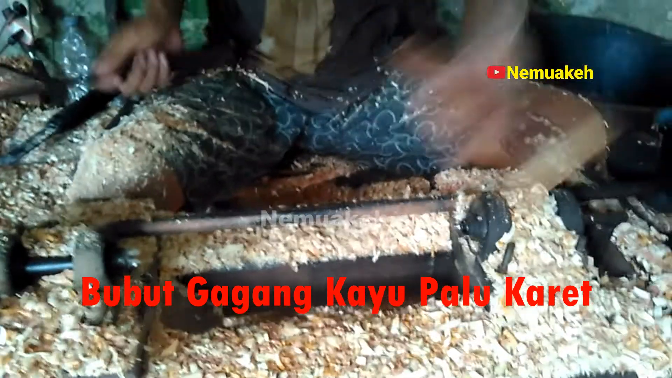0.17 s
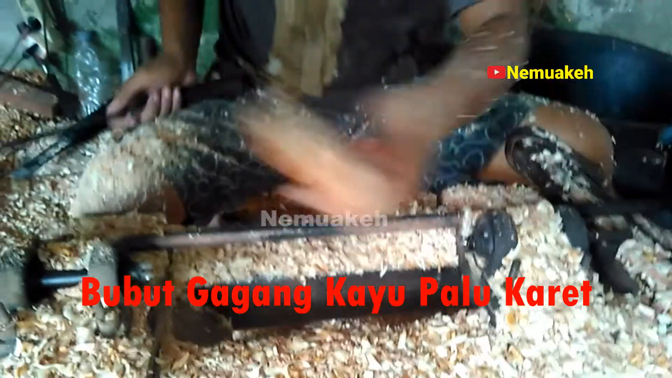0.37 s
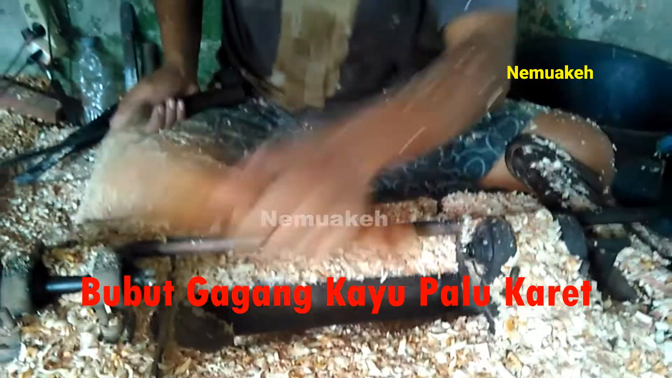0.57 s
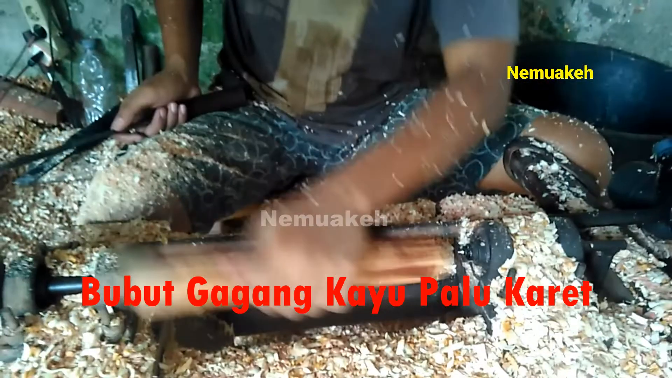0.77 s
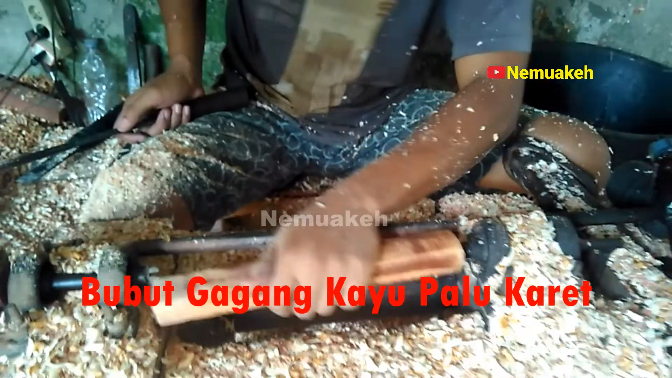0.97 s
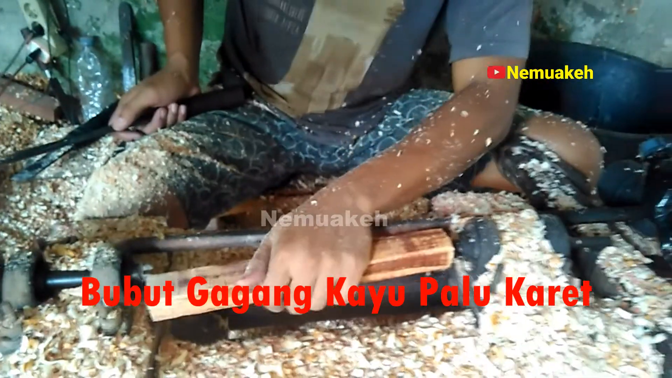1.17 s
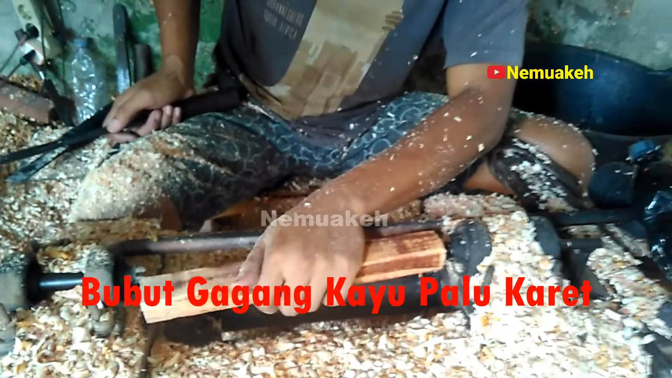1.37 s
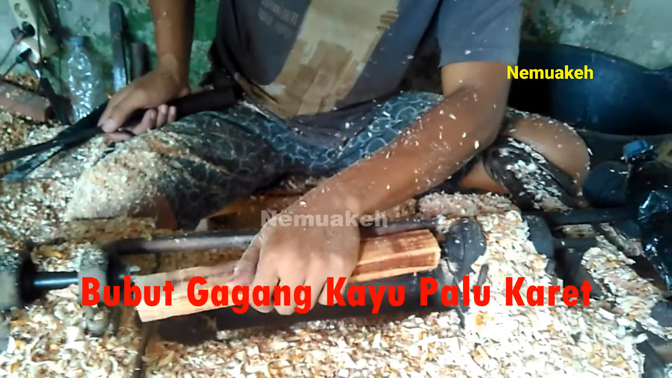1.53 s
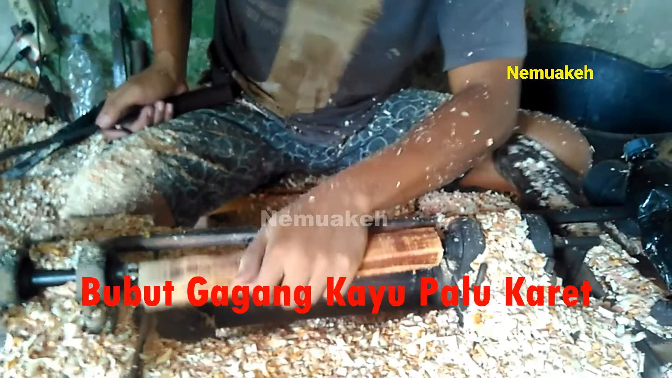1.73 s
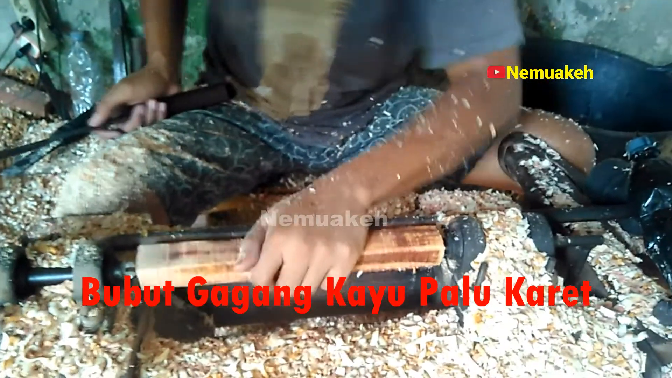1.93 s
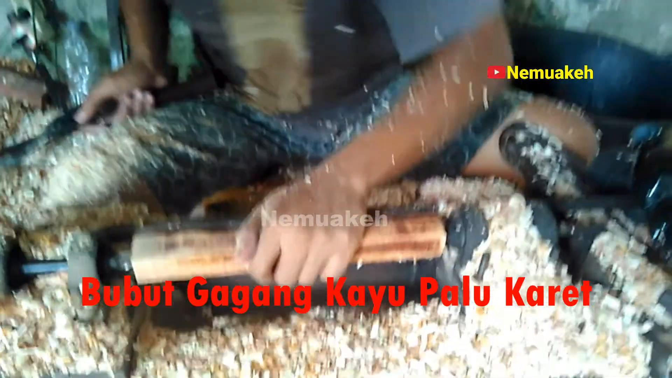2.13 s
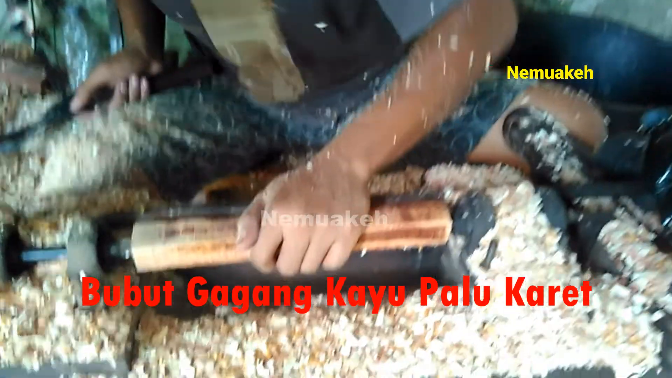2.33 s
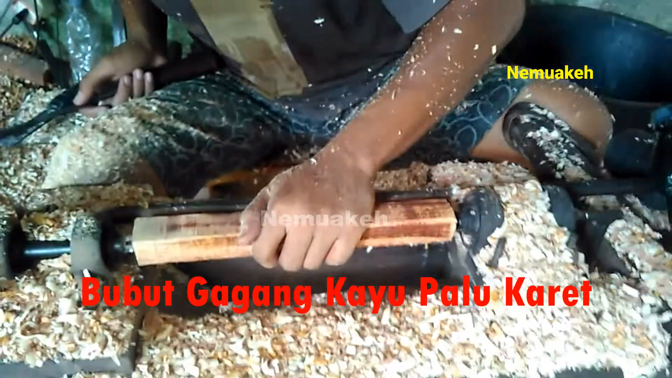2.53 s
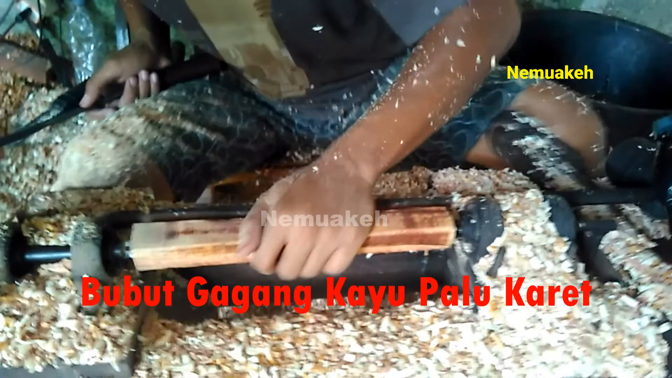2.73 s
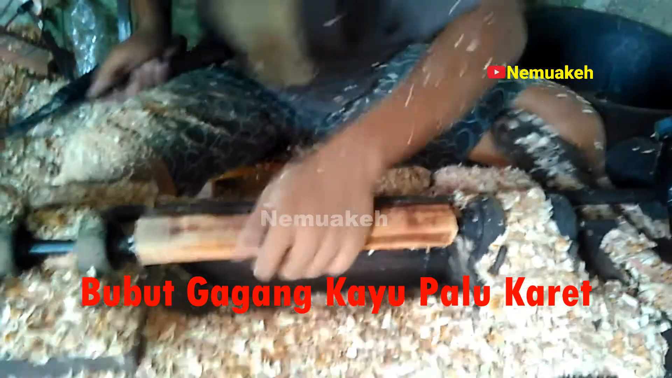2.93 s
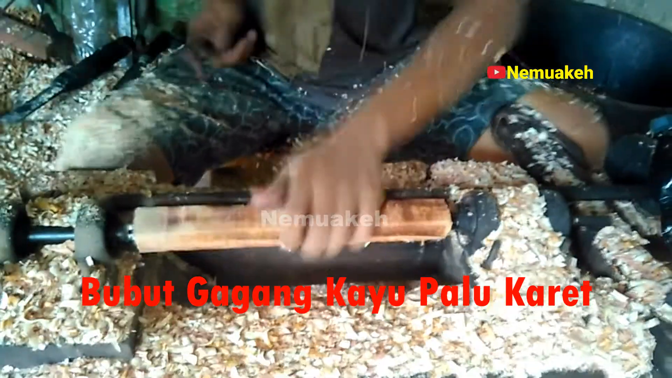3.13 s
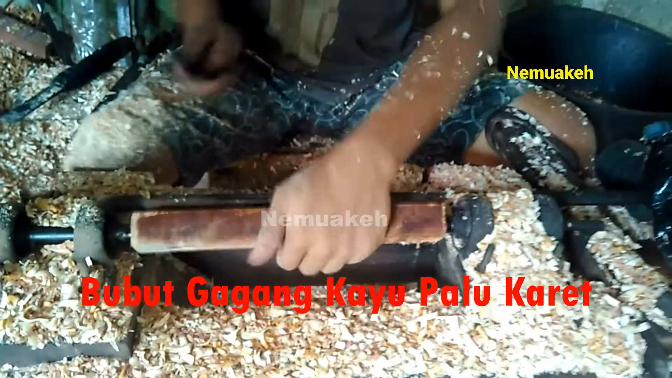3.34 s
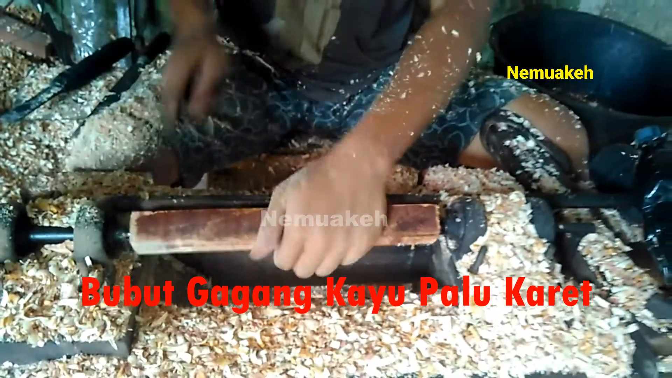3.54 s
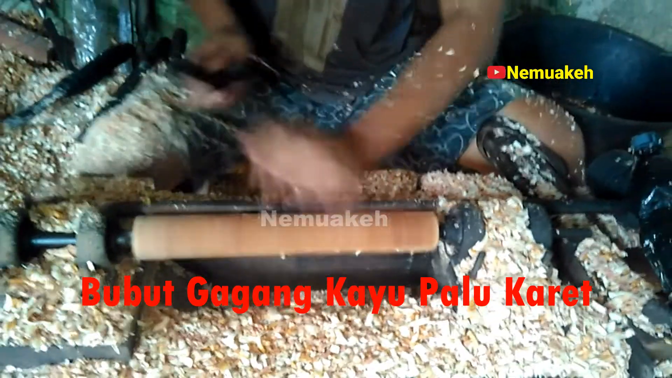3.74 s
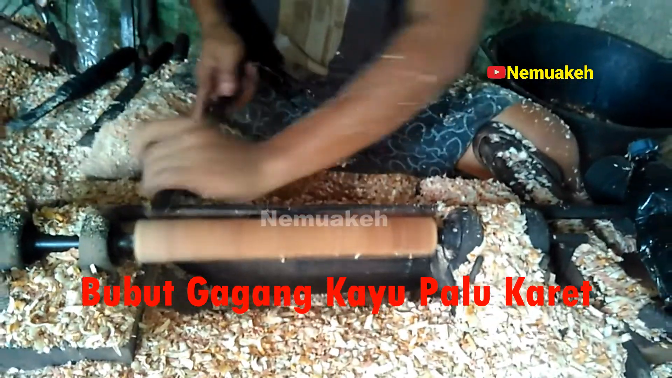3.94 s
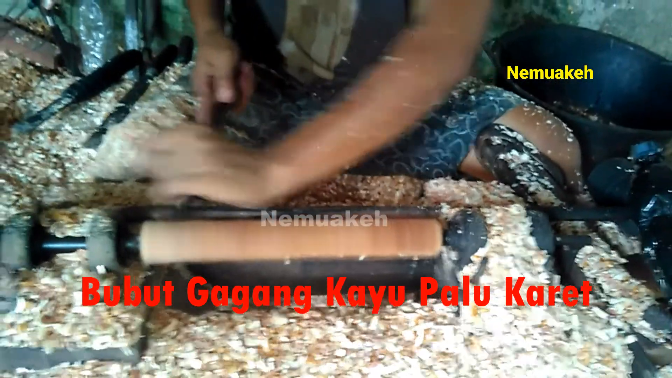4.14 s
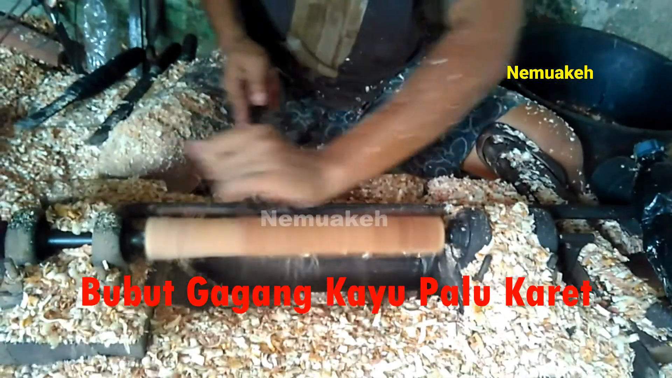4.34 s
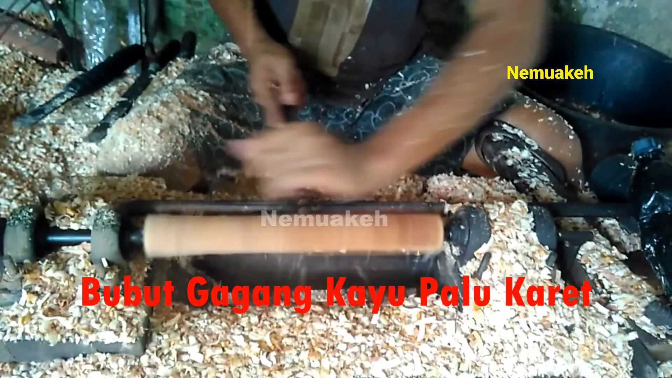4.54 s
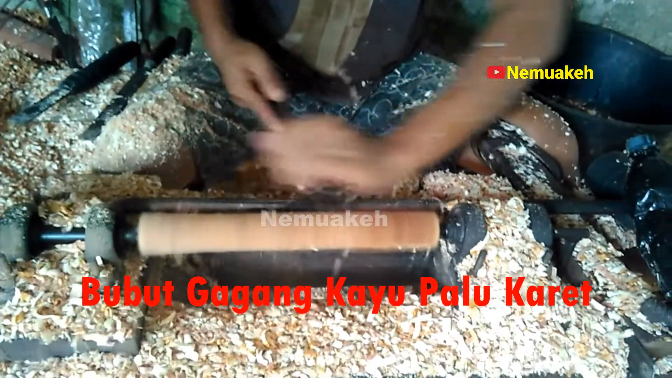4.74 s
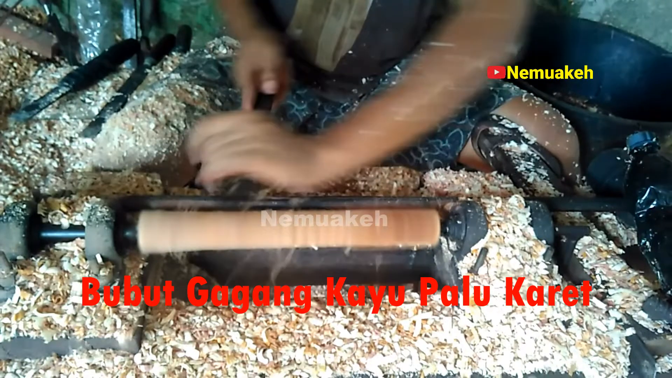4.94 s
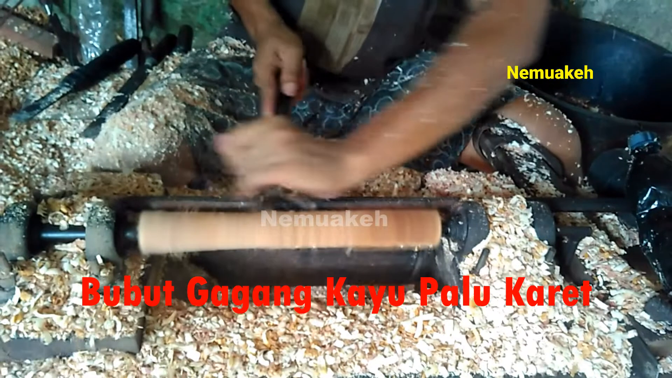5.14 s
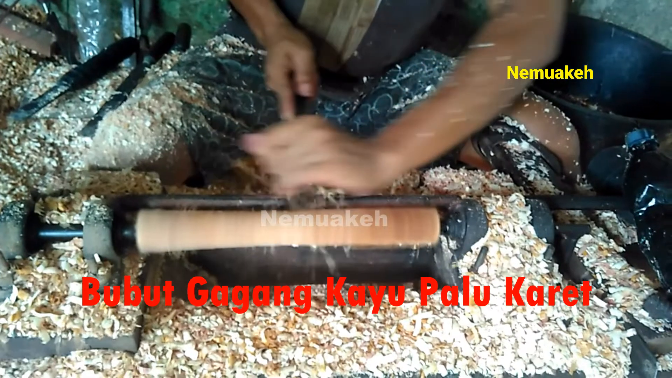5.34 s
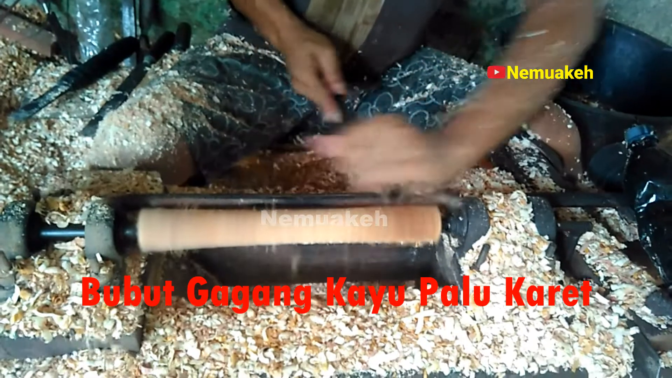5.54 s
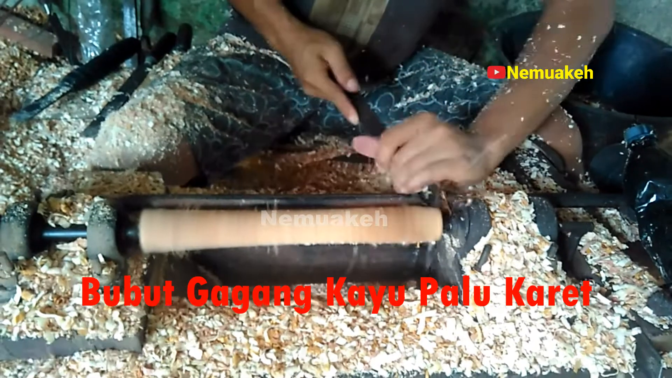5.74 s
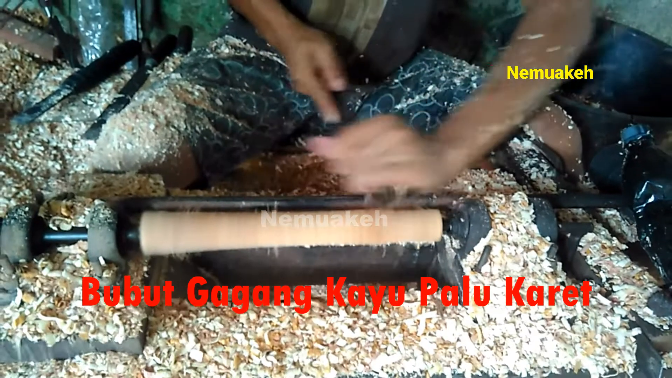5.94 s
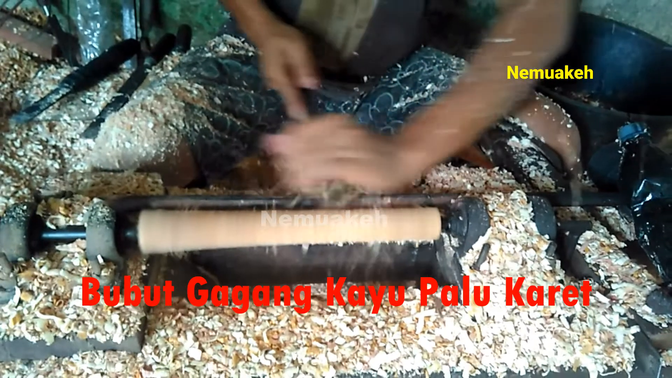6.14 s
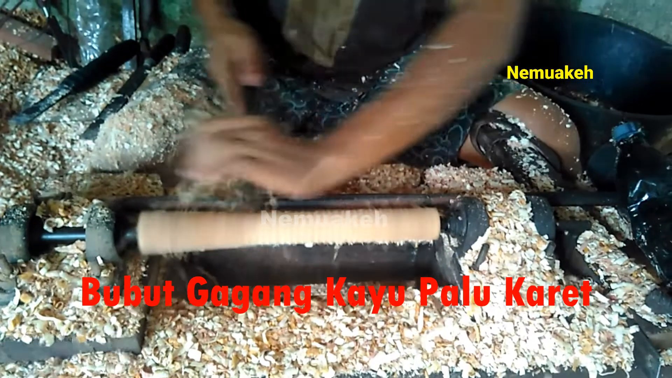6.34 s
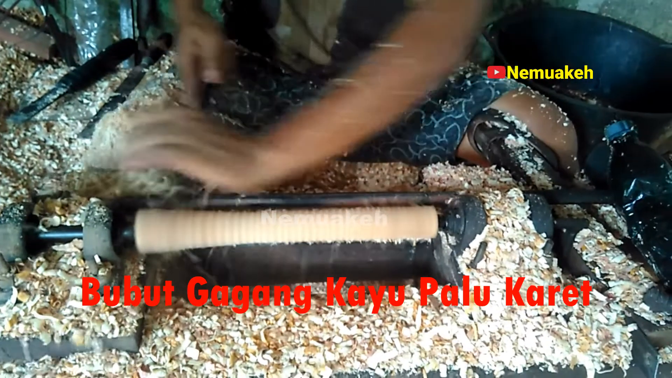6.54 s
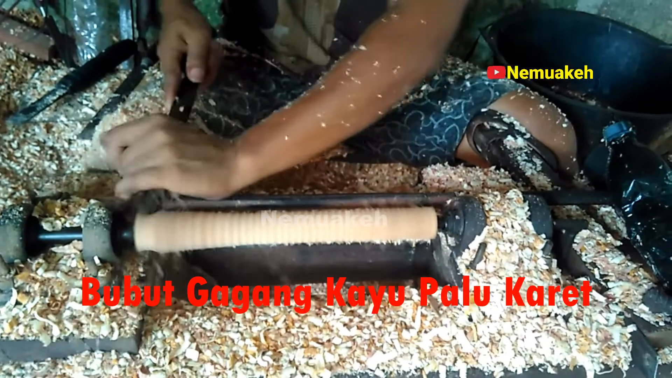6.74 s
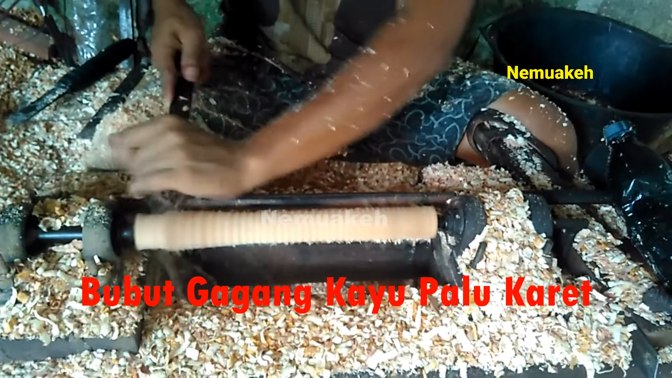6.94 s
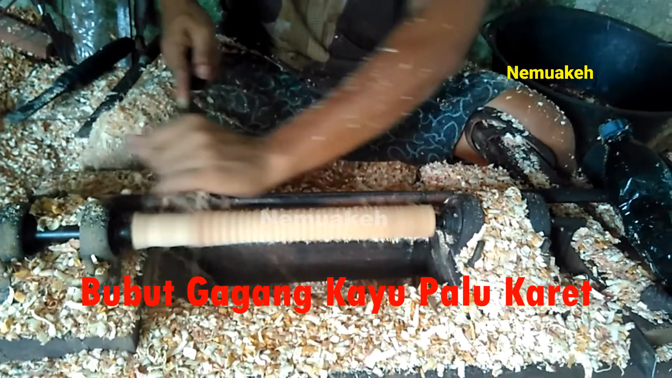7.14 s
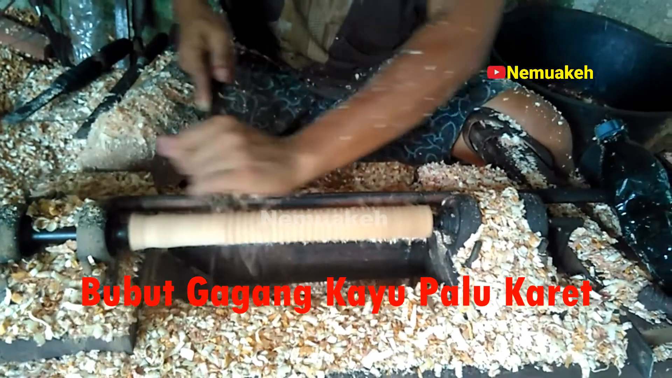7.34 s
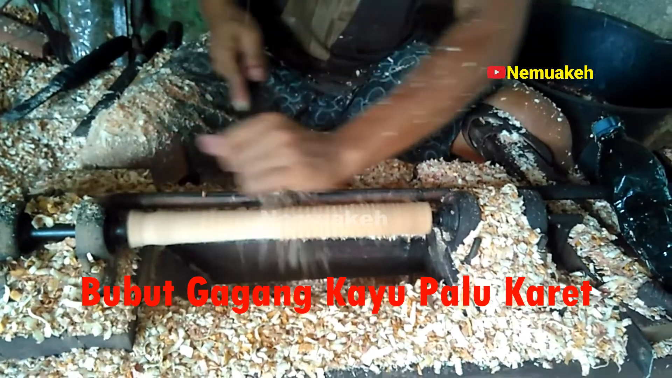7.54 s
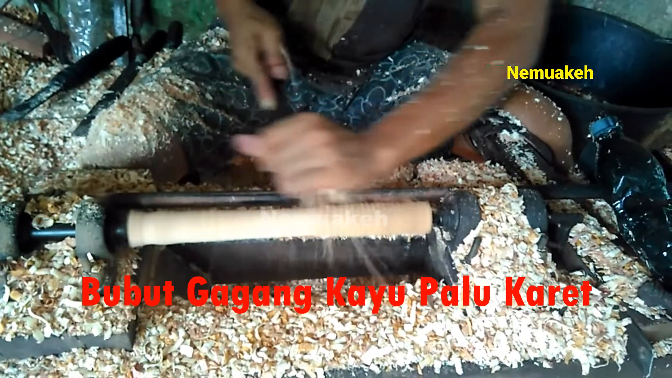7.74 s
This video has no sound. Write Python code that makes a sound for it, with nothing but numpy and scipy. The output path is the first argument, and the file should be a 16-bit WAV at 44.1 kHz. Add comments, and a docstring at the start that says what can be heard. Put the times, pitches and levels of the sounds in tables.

```python
"""A woodturning workshop, close to a small lathe. A wooden billet is knocked in, twisted until it squeaks, and
spun up; a hand chisel then roughs it down in long and short strokes. Chips tear off, pulsing once a turn, and
set the steel blade ringing, so loud that the peaks are cut flat. A motor drones underneath, and before the cut,
birds and a far rooster carry in from the yard."""
import sys
import numpy as np
from scipy import signal
from scipy.fft import rfft, irfft, next_fast_len
from scipy.io import wavfile
from scipy.ndimage import uniform_filter1d, map_coordinates

SR = 44100
rng = np.random.default_rng(int(sys.argv[2]) if len(sys.argv) > 2 else 0)


def wav_out(sig):
    """Save sig, one row per channel (or a flat mono array), as 16-bit PCM at SR to the path in sys.argv[1]."""
    wavfile.write(sys.argv[1], SR, np.round(np.clip(np.atleast_2d(sig).T, -1, 1) * 32767).astype(np.int16))


N = 348390
T = np.arange(N) / SR

# Levels in the tables are relative; each layer gets its own trim in the mix.
# chisel strokes, the last three columns riding on the hiss:
# start_s, end_s, settle_s, release_s, hiss_db, rasp_db, wood_db, ring_db
STROKES = [(4.17, 4.7, 0.17, 0.068, -8.5, -6, -12.5, -2),
           (4.846, 4.988, 0.022, 0.026, -7, -5.5, -13.5, -5.5),
           (5.114, 5.715, 0.011, 0.065, -8.5, -7, -12, -2.5),
           (5.76, 5.831, .03, 0.019, -13.5, -2, -16.5, -6),
           (5.862, 6.628, 0.0088, 0.042, -7.5, -6.2, -13, -4.5),
           (6.766, 8.303, 0.011, .025, -9, -3, -12.5, -3)]
# colours of the cut: freq_hz, level_db
CHIP_HISS_EQ = [(2650, -41), (4500, -8.5), (6360, -1.5), (6630, 3), (7230, -2.5), (7980, 0.5), (9710, 0.5),
                (13700, -6.5), (15400, -33)]  # bright spray of chips
CHIP_RASP_EQ = [(1180, -18.5), (2000, -8.5), (2420, -9), (2700, -3), (3040, -6.5), (3760, 0.5),
                (4070, -7.5), (5500, -4), (7150, -10), (12100, -120)]  # coarse tearing
WOOD_BODY_EQ = [(29, -49), (50, -9.5), (456, -3.5), (546, 0), (891, -2), (1070, -1.5), (1180, -6),
                (1560, -1.5), (1920, -6.5), (2500, -2), (3250, -6.5), (5500, -120)]  # the shaken billet
# bending modes of the chisel blade: pitch_hz, width_hz, level_db, pan_db
BLADE_MODES = [(3680, 70, -9, -3), (3990, 60, -10, -3), (4265, 28, -3, -6), (4785, 60, -6, -7),
               (5165, 40, -8, -2), (5700, 70, -6, 3), (6122, 30, -6, 0), (6675, 55, 0, 0),
               (7170, 30, -7, 0), (7712, 25, 2, -4), (8260, 55, -5, 0), (8820, 55, -3, 0),
               (9428, 30, -1, 5), (9980, 40, -4, 4), (10622, 35, -4, 8), (11202, 35, -3, 9)]
# stick-slip of the edge: start_s, length_s, first_slip_hz, last_slip_hz, level_db
SQUEALS = [(4.57, .14, 266.5, 266, -18), (4.965, .06, 266.5, 266, -12), (5.66, .07, 266.5, 266, -20),
           (6.61, .06, 267, 266.5, -11)]
# steely colour of the squeal: freq_hz, level_db
SQUEAL_EQ = [(2000, -30), (3300, -15), (3700, -16), (4000, -7), (4265, 0), (4530, -24), (4790, -6),
             (5500, -17), (9000, -13), (11200, -14)]
# colours of the spinning billet: freq_hz, level_db
RATTLE_EQ = [(88, -45), (150, -15), (357, -19), (418, -9), (605, -9), (708, -3), (1050, -12), (1360, 1),
             (1940, -12.5), (2480, -7.5), (4500, -35), (5850, -37), (9900, -120)]  # rattle on the centres
WHIRR_EQ = [(1760, -34), (3000, 5), (3750, 1.5), (12200, -8.5), (14400, -20), (14700, -43), (15000, -74)]  # airy top of the spin
CHATTER_EQ = [(59, -43), (100, -29), (477, -39), (616, 5), (851, 0), (1270, 0), (1740, -8), (2500, -22),
              (3250, -36), (5500, -120)]  # blade riding on the wood
SKIM_EQ = [(1060, -12), (1800, -8), (4140, -3.5), (8210, -8), (10800, -3), (14200, -19), (14600, -32),
           (15000, -67)]  # its light, bright scrape
# knocks of billet and chisel, and at 2.24-2.33 s shavings snapping with a fuller body: time_s, crack_db,
# wood_vs_crack_db
KNOCKS = [(0.454, -35, -17), (0.5718, -7.5, -9), (1.729, -33.5, -26), (2.2385, -38.5, -30),
          (2.3005, -36, -30), (2.3297, -30.5, -36), (3.5768, 1, -6.5), (4.004, 9.5, -46), (4.152, -9, -27),
          (4.1676, 3.5, -20), (4.829, 5, -36), (6.733, -2, -33), (6.752, -2.5, -17)]
# sharp attack of a knock: freq_hz, level_db
CRACK_EQ = [(1060, -3), (1800, -2), (3560, 3.5), (4040, -3), (4820, 2), (5810, -2), (6990, -4.5), (9540, 5),
            (13800, -5.5), (15000, -35)]
# dull modes of the billet: pitch_hz, width_hz, level_db
BILLET_MODES = [(400, 55, 1.5), (786, 50, 9.5), (922, 70, 8.5), (1190, 190, 3), (1556, 29, 2.5),
                (1760, 22, -16), (2210, 54, -23)]
# bumps against the lathe bed: time_s, level_db
BUMPS = [(0.814, -22), (0.946, -41), (2.58, -36.5)]
# hollow colour of the bed: freq_hz, level_db
BED_EQ = [(150, -45), (250, -14), (734, 2), (1110, -15), (1450, -13.5), (2630, -26), (3090, -31),
          (3520, -20), (5050, -57), (5470, -30), (6000, -50), (7800, -80), (13200, -120)]
# sweeps of the hand over billet and shavings: peak_s, rise_s, fall_s, rub_db, brush_db
HAND_SWEEPS = [(.02, .05, 0.073, -52.5, -47.5), (.49, 0.12, .12, -62, -54.5), (.97, 0.083, 0.21, -82, -64),
               (1.78, 0.04, 0.16, -78, -61), (2.856, 0.042, 0.055, -52.5, -44.5),
               (3.098, 0.039, 0.044, -44, -42), (3.158, 0.027, 0.07, -49, -46.5),
               (3.372, 0.087, 0.081, -49, -50)]
# squeaks of the twisted billet: start_s, length_s, first_hz, last_hz, level_db
SQUEAKS = [(3.3, 0.051, 770, 995, -46), (3.355, 0.034, 1236, 1295, -45.5), (3.385, 0.057, 1030, 655, -47.5)]
# colours of the handling: freq_hz, level_db
RUSTLE_EQ = [(2350, -22), (4000, -12), (4800, -7), (5350, -4), (7310, -2.5), (10600, 6.5), (13700, -6),
             (14500, -54)]  # dry shavings
RUB_EQ = [(240, -39), (400, -10), (730, -12), (915, -5), (1100, -10), (2460, -4), (4170, -6.5), (8000, -9),
          (10400, -27), (17600, -120)]  # wood on steel
SQUEAK_EQ = [(600, -9), (900, -2), (1300, 5), (1900, -2.5), (3000, -6), (6000, -2)]  # body of the squeak
# shavings snapping: time_s, level_db
SNAPS = [(0.2793, -33), (0.3436, -28), (0.455, -24), (1.2414, -41), (2.331, -29)]
# fader ride on motor and belt: time_s, level_db
DRONE_RIDE = [(0, -41.5), (.5, -37.5), (1.1, -42.5), (2.1, -52), (2.9, -46.5), (3.6, -46), (3.85, -39.5),
              (4.1, -42.5), (4.8, -36.5), (5.5, -43), (7.9, -47)]
# still air of the shop: freq_hz, level_db
ROOM_TONE_EQ = [(41, -5), (70, 3.5), (271, -15), (802, -18), (1430, -25), (2320, -25), (2780, -33),
                (3100, -27), (4620, -37), (10300, -61.5), (14000, -44)]
# one bird's repeated rising whistle: start_s
WHISTLE_STARTS = [.29, 1.06, 1.88]
# falling chirps and the rooster's crow: start_s, length_s, first_hz, last_hz, level_db
CHIRPS = [(0.818, .19, 5480, 4530, -54.5), (.98, .12, 4540, 2970, -59), (1.198, 0.14, 4220, 2830, -58),
          (1.407, 0.13, 4410, 2480, -60), (1.597, 0.093, 4810, 4200, -64), (1.702, 0.17, 3300, 2640, -59),
          (2.118, 0.046, 3750, 3430, -59.5), (2.208, .07, 4950, 4700, -66), (2.351, 0.048, 2390, 2200, -62),
          (2.532, .088, 5450, 5070, -62), (2.6, .13, 2315, 2230, -66), (2.62, 0.0247, 4020, 3400, -57.5),
          (2.724, .065, 4720, 4540, -65.5)]
ROOSTER = [(.19, 0.12, 722, 720, -51.5), (.31, 0.24, 725, 707, -57)]
# likeness of left and right: freq_hz, correlation
STEREO_LIKENESS = [(60, -1.1), (110, -0.22), (200, -0.3), (380, -0.43), (700, -0.68), (1290, -0.13),
                   (2380, -0.16), (4400, -0.002), (8120, -0.16), (15000, -0.17)]
# placement of the cut and the bench, positive to the left: freq_hz, pan_db
CUT_PAN = [(60, -9), (110, 0.5), (200, 1.5), (380, -1), (700, 1.5), (1290, 2), (2380, -1), (4400, -3),
           (8120, 4), (15000, 6)]
BENCH_PAN = [(100, 4.5), (700, 8.5), (2500, 0), (9000, 8)]
# reverb of workshop and yard: freq_hz, t60_s
SHOP_DECAY = [(200, 0.18), (2000, 0.17), (10000, .14)]
YARD_DECAY = [(500, 0.96), (2400, 0.76), (5000, 0.25)]

BITE_HISS_DB, BITE_RASP_DB, BITE_WOOD_DB = -6.5, 10, 6.5  # the edge digs in: darker and coarser
EASE_S, EASE_RASP_DB, EASE_RING_DB = 0.07, -7, 6.5  # it eases off: the blade rings freely
DAMPING_DB_PER_S = 4  # the ring fades while the edge stays buried
BELT_GRIPS_S, SPIN_UP_S, RUN_IN_S = 3.66, 0.0475, 0.39
TURNS_PER_S, LOAD_SAG = 55.5, 0.0145  # free speed, and the share lost in a cut
WHISTLE_S, WHISTLE_FROM_HZ, WHISTLE_TO_HZ, WHISTLE_DB = 0.24, 2266, 2550.5, -54
TOP_HZ = 15800


def cutting(angle):
    """The edge tears chips from the billet; the same tearing shakes the wood and rings the blade."""
    hiss, rasp, body, ringing = sum(stroke(*row) for row in STROKES)
    ring = ringing / (hiss + 1e-12)
    hiss = hiss * amp(1.02 * wobble(14))  # the hand's pressure wanders
    rasp = rasp * amp(0.7 * wobble(7.9))
    feed = throb(angle, depth=0.057) * amp(0.26 * wobble(60))
    spray = shaped(patchy(grains(per_s=16000, spread_db=3), depth_db=3.5), CHIP_HISS_EQ, CUT_PAN)
    tearing = shaped(patchy(grains(per_s=9000, spread_db=1), depth_db=4), CHIP_RASP_EQ, CUT_PAN)
    chips = amp(4) * (hiss * spray + rasp * tearing)
    shaking = shaped(grains(per_s=5000, spread_db=0.5), WOOD_BODY_EQ, CUT_PAN)
    wood = amp(5.5) * body * throb(angle, depth=0.033) * shaking
    force = np.sqrt(np.abs(uniform_filter1d(np.mean(chips ** 2, axis=0), size=800)))
    steel = ring * force * blade(swell_db=3)
    # what goes into the ring of the blade is taken from the chips
    return feed * (wood + (chips + steel) / np.sqrt(1 + ring ** 2))


def stroke(start, end, settle, release, hiss_db, rasp_db, wood_db, ring_db):
    """The edge digs in, settles to an even cut and eases off: envelopes of hiss, rasp, wood and ring."""
    age = np.maximum(T - start, 0)
    bite = np.exp(-(age / settle) ** 2)
    ease = np.exp(-np.maximum(end - T, 0) / EASE_S)
    hiss = amp(hiss_db + BITE_HISS_DB * bite) * gate(start, end, rise=0.0059, fall=release)
    rasp = amp(rasp_db + BITE_RASP_DB * bite + EASE_RASP_DB * ease)
    wood = amp(wood_db + BITE_WOOD_DB * bite)
    ring = amp(ring_db - DAMPING_DB_PER_S * age + EASE_RING_DB * ease)
    return np.array([hiss, hiss * rasp, hiss * wood, hiss * ring])


def edge_load():
    """How firmly the edge is in the wood, 0-1."""
    contacts = [gate(start, end, rise=.003, fall=release) for start, end, _, release, *_ in STROKES]
    return np.max(contacts, axis=0)


def blade(swell_db):
    """Each mode of the steel swells and fades as the contact point moves."""
    out = np.zeros((2, N))
    for hz, width, db, pan_db in BLADE_MODES:
        pole = np.exp((2j * np.pi * hz - np.pi * width) / SR)
        mode = signal.lfilter([width], [1, -pole], rng.standard_normal(N))
        mode *= amp(db + swell_db * wobble(11))
        # left and right sit at different points of the mode's sound field
        shifted = mode * np.exp(1j * rng.normal(0, .8))
        out += pan(pan_db) * np.array([mode.real, shifted.real])
    return unit(out)


def squeals():
    """The edge sticks and slips as it eases off, turning the ring into a brief buzzing squeal."""
    slip_hz = SQUEALS[0][2]
    overtones_db = along(SQUEAL_EQ, slip_hz * np.arange(1, 43))
    return pan(-3) * glides(SQUEALS, overtones_db, rough=.002, flutter_db=1.5)


def spindle(angle):
    """The billet rattles and whirrs on its centres, and chatters once the blade rests on it."""
    run_in_left = np.clip(1 - (T - BELT_GRIPS_S) / RUN_IN_S, 0, 1)
    rattle = shaped(grains(per_s=5000, spread_db=1.5), RATTLE_EQ, BENCH_PAN)
    rattle *= amp(-30.5 - 8.5 * run_in_left) * throb(angle, depth=0.13)
    whirr = shaped(grains(per_s=8000, spread_db=3), WHIRR_EQ, BENCH_PAN)
    whirr *= amp(-26 - 18.5 * run_in_left)
    chatter = amp(-20.5) * throb(angle, depth=.4) * shaped(noise(), CHATTER_EQ, CUT_PAN)
    skim_gain = amp(-17 + 0.56 * wobble(70)) * throb(angle, depth=0.091)
    skim = skim_gain * shaped(grains(per_s=5500, spread_db=0.5), SKIM_EQ, CUT_PAN)
    blade_resting = fade_in(4.005, rise=0.02)
    return fade_in(BELT_GRIPS_S, SPIN_UP_S) * (rattle + whirr) + blade_resting * (chatter + skim)


def knocks():
    """Each blow, or fuller snap of a shaving, is a sharp crack, a short clatter and the dull ring of the
    billet."""
    crack, push = np.zeros((2, N))
    for s, db, wood_db in KNOCKS:
        hit = gate(s - .001, s + 0.0013, rise=0.0073, fall=0.0027)
        clatter = 0.15 * gate(s - .004, s, rise=0.0032, fall=0.0085)
        crack += amp(db) * (hit + clatter)
        push += amp(db + wood_db) * (hit + clatter)
    attack = amp(-3) * crack * shaped(noise(), CRACK_EQ, BENCH_PAN)
    billet_rms = np.sqrt(np.mean(np.abs(billet(np.linspace(0, SR / 2, 4096))) ** 2))
    thud = amp(-2.5) * pan(1.3) * filtered(push * noise(), billet) / billet_rms
    direct = attack + thud
    return direct + amp(-4) * reverb(direct, SHOP_DECAY)


def billet(freq_hz):
    """The wood's response: its modes added with alternating polarity."""
    return sum((-1) ** k * amp(db) * resonance(freq_hz, hz, width)
               for k, (hz, width, db) in enumerate(BILLET_MODES))


def bumps():
    """The billet bumps against the hollow bed."""
    blows = np.zeros(N)
    for s, db in BUMPS:
        hit = gate(s - .001, s + 0.0021, rise=0.00078, fall=0.0073)
        tail = 0.17 * gate(s, s, rise=0.004, fall=0.049)
        blows += amp(db) * (hit + tail)
    return amp(-8) * blows * shaped(noise(), BED_EQ, BENCH_PAN)


def handling():
    """A hand brushes shavings aside and twists the billet, which rubs and squeaks on its centres."""
    pressure = np.zeros(N)
    brush = amp(-64) * gate(0, 2.64, rise=0.32, fall=0.12)  # loose shavings under the arm
    for s, rise, fall, rub_db, brush_db in HAND_SWEEPS:
        touch = np.exp(-np.maximum((s - T) / rise, (T - s) / fall))
        pressure += amp(rub_db) * touch
        brush += amp(brush_db) * touch
    rustle = amp(2) * brush * shaped(grains(per_s=22000, spread_db=2), RUSTLE_EQ, BENCH_PAN)
    rub = amp(0.5) * pressure * shaped(grains(per_s=7000, spread_db=2.5), RUB_EQ, BENCH_PAN)
    slips = glides(SQUEAKS, overtones_db=[0, -3, -10, -17], rough=.06, flutter_db=1.5)
    squeak = filtered(slips, lambda hz: amp(along(SQUEAK_EQ, hz)))
    squeak_tail = reverb(squeak, decay=[(1500, 0.21)])
    return rustle + rub + pan(5.9) * (amp(3) * squeak + amp(0.5) * squeak_tail)


def snaps():
    """A dry shaving breaks with one tiny tick."""
    ticks = sum(amp(db) * gate(s, s + .001, rise=.0005, fall=.001) for s, db in SNAPS)
    return amp(-8.5) * ticks * shaped(noise(), RUSTLE_EQ, BENCH_PAN)


def motor(free_running):
    """A low, wavering drone that swells while the billet spins with no load."""
    rumble = unit(filtered(noise(), lambda f: resonance(f, hz=55.4, width=25) ** 2))
    hum = np.sqrt(2) * np.sin(2 * np.pi * 51 * T + 0.93 * wobble(5.7))
    wide_hum = np.array([[1.3], [-.4]]) * hum  # opposite in phase left and right
    ride_db = np.interp(T, *np.transpose(DRONE_RIDE))
    level_db = ride_db + 3.5 + 0.5 * wobble(12) + 4 * free_running
    return amp(level_db) * unit(0.34 * rumble + wide_hum)


def outdoors():
    """Songbirds and a far rooster, blurred by the yard."""
    whistles = [(s, WHISTLE_S, WHISTLE_FROM_HZ, WHISTLE_TO_HZ, WHISTLE_DB) for s in WHISTLE_STARTS]
    birds = glides(whistles + CHIRPS, overtones_db=[0], rough=.012, flutter_db=3)
    crow = glides(ROOSTER, overtones_db=[-12, 0, -26], rough=.009, flutter_db=2)
    calls = birds + amp(-0.5) * crow
    return pan(4) * amp(-3.5) * (0.46 * calls + reverb(calls, YARD_DECAY))


def room_tone():
    """The still air of the shop, a faint dark bed."""
    return amp(-55) * shaped(noise(), ROOM_TONE_EQ, BENCH_PAN)


def amp(db):
    """Decibels to gain."""
    return 10 ** (np.asarray(db) / 20)


def unit(x):
    """Scaled to rms 1."""
    return x / np.sqrt(np.mean(x ** 2) + 1e-20)


def along(points, hz):
    """A curve of (freq_hz, value) points read on a log axis."""
    freqs, values = np.transpose(points)
    return np.interp(np.log(hz + 1), np.log(freqs + 1), values)


def fade_in(start, rise):
    """A straight ramp up to 1 that stays open."""
    return np.clip((T - start) / rise, 0, 1)


def gate(start, end, rise, fall):
    """Opens at start and dies away after end; all in seconds."""
    return fade_in(start, rise) * np.exp(-np.maximum(T - end, 0) / fall)


def wobble(per_s):
    """A smooth random curve with per_s knots a second."""
    return map_coordinates(rng.standard_normal(int(N * per_s / SR) + 4), [T * per_s])


def throb(angle, depth):
    """The billet's high side comes round once a turn."""
    return unit(np.exp(depth * (np.cos(angle) + .5 * np.cos(2 * angle))))


def filtered(x, response):
    """x through a response given as a function of frequency."""
    size = next_fast_len(N + SR // 4)
    return irfft(rfft(x, size) * response(np.fft.rfftfreq(size, 1 / SR)), size)[..., :N]


def resonance(f, hz, width):
    """Causal response of one mode."""
    return 1j * f * width / (hz * hz - f * f + 1j * f * width)


def pan(pan_db):
    """Left and right gains for a level difference."""
    return amp(np.array([[.5], [-.5]]) * pan_db)


def noise():
    """Two unrelated white noises."""
    return rng.standard_normal((2, N))


def grains(per_s, spread_db):
    """Two streams of tiny clicks of uneven size."""
    clicks = noise() * (rng.random((2, N)) < per_s / SR)
    return unit(clicks * amp(spread_db * noise()))


def shaped(pair, eq, placement):
    """A pair of white signals given colour, width and place, at rms 1."""
    size = next_fast_len(N + SR // 4)
    hz = np.fft.rfftfreq(size, 1 / SR)
    spread = np.arccos(np.clip(along(STEREO_LIKENESS, hz), -1, 1)) / 2
    mid, side = rfft(pair, size) * amp(along(eq, hz)) * [np.cos(spread), np.sin(spread)]
    stereo = np.array([mid + side, mid - side]) * pan(along(placement, hz))
    return unit(irfft(stereo, size)[:, :N])


def patchy(pair, depth_db):
    """The colour shifts at random from moment to moment."""
    frames = signal.stft(pair, nperseg=512)[2]
    patches = uniform_filter1d(rng.standard_normal(frames.shape[1:]), size=6, axis=0)
    patches = uniform_filter1d(patches, size=14, axis=1)
    return signal.istft(frames * amp(depth_db * unit(patches)), nperseg=512)[1][:, :N]


def reverb(x, decay):
    """A diffuse tail whose decay time follows a curve of (freq_hz, t60_s) points."""
    hz, t, frames = signal.stft(rng.standard_normal((2, SR // 2)), SR, nperseg=256)
    tail = signal.istft(frames * amp(-60 * t / along(decay, hz)[:, None]), SR, nperseg=256)[1]
    return signal.fftconvolve(np.atleast_2d(x), tail / np.linalg.norm(tail[0]), axes=1)[:, :N]


def glides(rows, overtones_db, rough, flutter_db):
    """Gliding tones with an unsteady pitch and level."""
    out = np.zeros(N)
    waver, flutter = 1 + rough * wobble(260), amp(flutter_db * wobble(35))
    for s, length, first_hz, last_hz, db in rows:
        progress = np.linspace(0, 1, round(length * SR))
        span = slice(round(s * SR), round(s * SR) + len(progress))
        pitch_hz = first_hz * (last_hz / first_hz) ** progress * waver[span]
        phase = 2 * np.pi * np.cumsum(pitch_hz) / SR
        tone = sum(amp(level) * np.sin(k * phase) for k, level in enumerate(overtones_db, 1))
        arch = np.sqrt(np.abs(np.sin(np.pi * progress)))
        out[span] += amp(db) * unit(tone * arch)
    return out * flutter


def scene():
    """The mix: cut and spindle pulse to the same rotation, which sags as the edge loads the motor."""
    running, load = fade_in(BELT_GRIPS_S, SPIN_UP_S), edge_load()
    angle = 2 * np.pi * np.cumsum(TURNS_PER_S * running * (1 - LOAD_SAG * load)) / SR
    lathe = cutting(angle) + squeals() + spindle(angle) + motor(running * (1 - load))
    return lathe + room_tone() + knocks() + bumps() + snaps() + handling() + outdoors()


def record(dry):
    """The sound is clipped flat at full scale, and a steep low-pass takes off the very top."""
    return filtered(np.clip(dry, -1, 1), lambda hz: np.clip((TOP_HZ - hz) / 500, 0, 1) ** 2)


dry = scene()
out = record(dry)
wav_out(out)
```